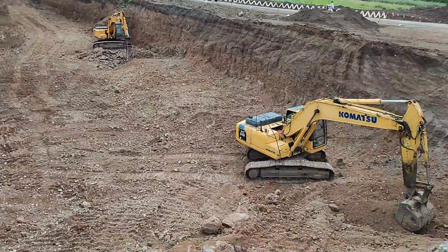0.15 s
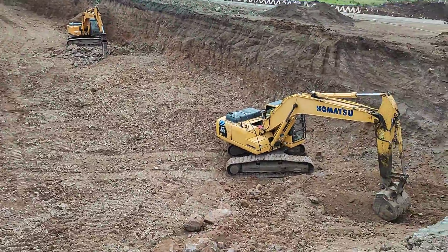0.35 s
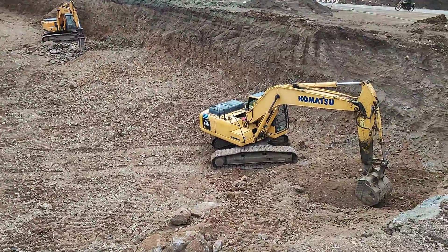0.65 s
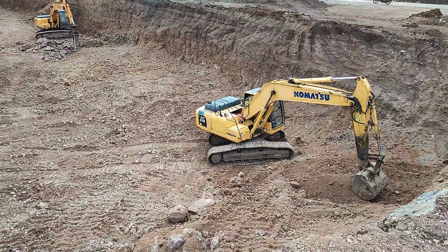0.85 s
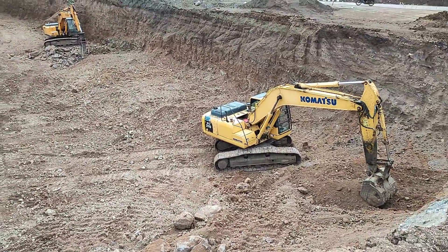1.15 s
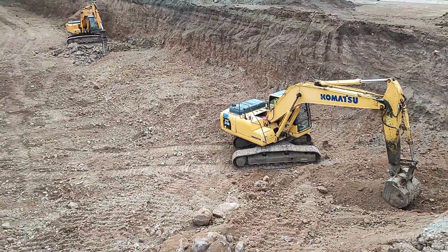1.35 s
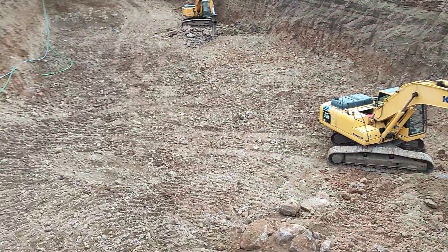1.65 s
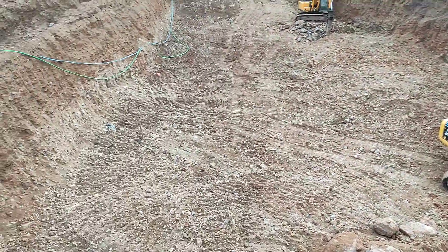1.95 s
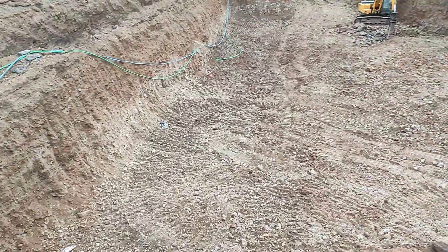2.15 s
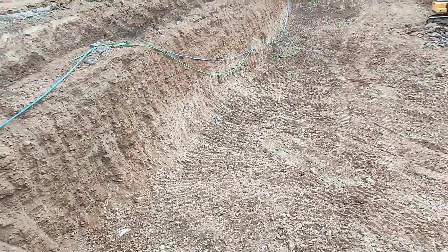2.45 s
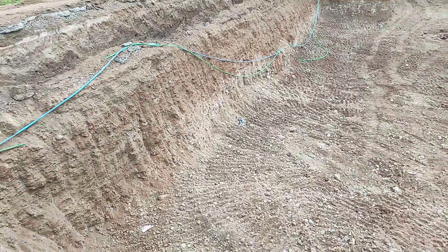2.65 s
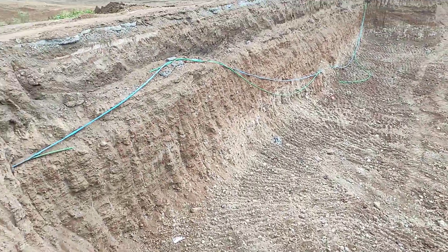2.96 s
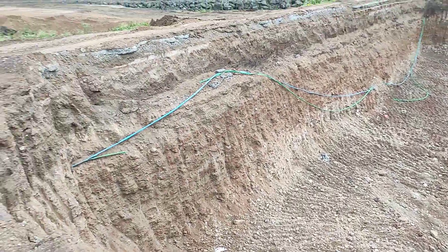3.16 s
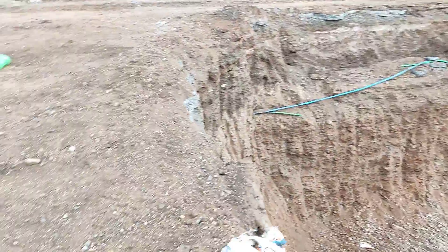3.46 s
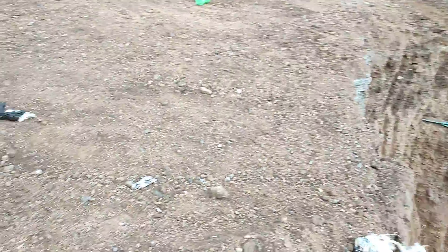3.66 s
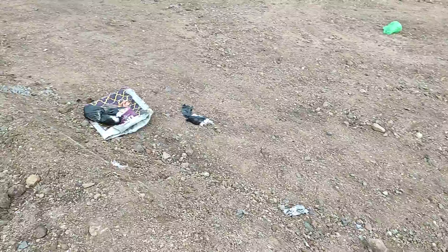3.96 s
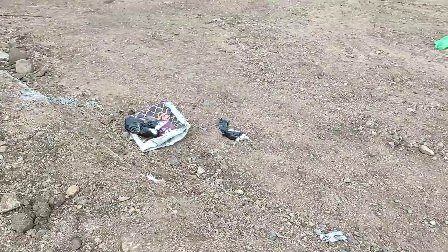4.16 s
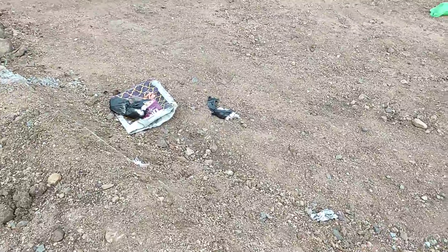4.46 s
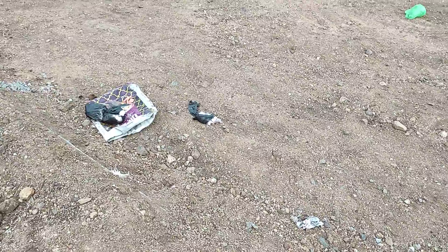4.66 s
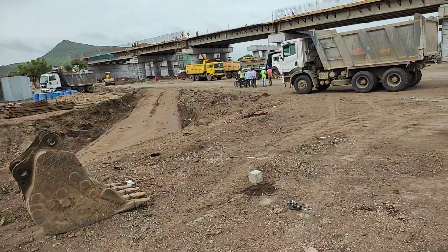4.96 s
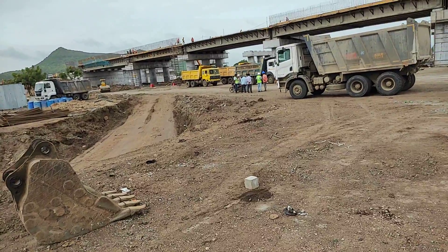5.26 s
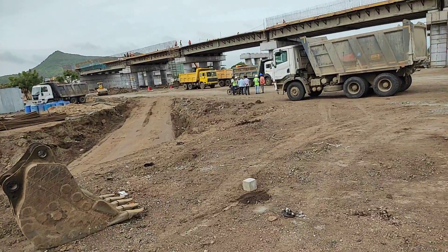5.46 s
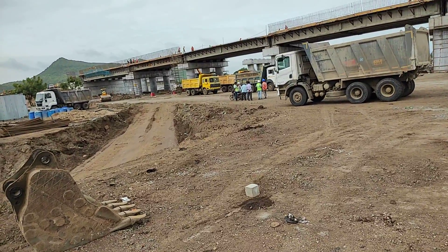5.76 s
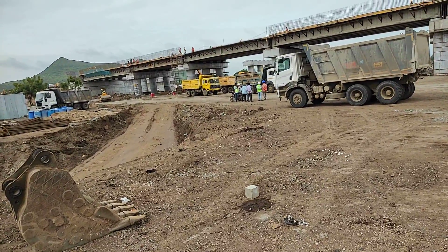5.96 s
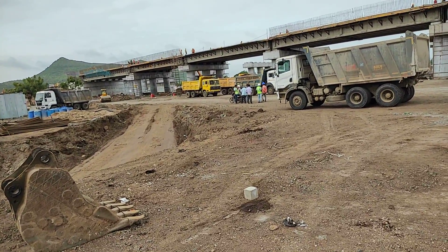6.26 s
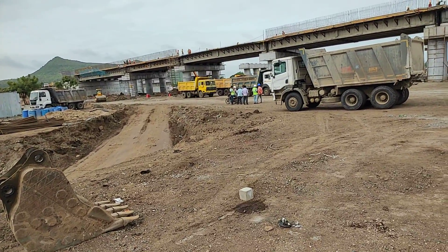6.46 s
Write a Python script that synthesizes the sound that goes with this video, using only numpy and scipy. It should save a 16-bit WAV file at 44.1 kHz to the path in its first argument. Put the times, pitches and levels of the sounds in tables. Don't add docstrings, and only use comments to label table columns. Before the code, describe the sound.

In an open pit heard from its rim, a hydraulic hammer pounds rock in fast, even blows, each with a hard crack, ringing steel, dull thump and hiss of oil, echoing off close walls. Diesel engines drone beneath. Wind slaps the handheld stereo microphone as it turns, loose rock slides and steel scrapes on stone. An abrupt cut moves to a yard, where the hammering restarts softer and grows again through strong gusts.

```python
import sys
import numpy as np
from scipy import signal
from scipy.fft import rfft, irfft, next_fast_len
from scipy.io import wavfile
from scipy.ndimage import uniform_filter1d

SR = 44100
rng = np.random.default_rng(int(sys.argv[2]) if len(sys.argv) > 2 else 0)


def unload_audio(sound):
    columns = np.transpose(np.atleast_2d(sound))
    steps = np.round(np.clip(columns, -1, 1) * 32767)
    wavfile.write(sys.argv[1], SR, steps.astype(np.int16))


def magnitude_from_level(level_db):
    exponent = np.asarray(level_db, float) / 20
    return 10 ** exponent


N = 291496
MOVE_S = 4.74

# (time [s], strength [dB])
RIM_BLOWS = [(0.1148, -20.5), (0.3086, -21), (0.504, -20.5), (0.6975, -19), (0.894, -19.5), (1.0894, -18.5),
             (1.283, -19.5), (1.4774, -21), (1.6727, -20), (1.8644, -18.5), (2.0586, -22), (2.255, -21.5),
             (2.4507, -21), (2.646, -21.5), (2.8427, -23), (3.0471, -23), (3.248, -22.5), (3.4473, -20.5),
             (3.645, -20.5), (3.8472, -26), (4.0502, -25.5), (4.2503, -25), (4.4491, -25.5),
             (4.6459, -26.5)]
# (time [s], strength [dB])
YARD_BLOWS = [
    (4.784, -28.5),
    (4.987, -28),
    (5.185, -25),
    (5.3808, -23),
    (5.5723, -22.5),
    (5.7685, -23.5),
    (5.9643, -24),
    (6.16, -25.5),
    (6.354, -24),
    (6.557, -21.5),
]
BLOWS = RIM_BLOWS + YARD_BLOWS
# (boom pitch [Hz], near wall delay [s], its level [dB], far wall delay [s], its level [dB])
PLACES = [
    (354.5, .03, -3, 0.038, -23),
    (340.3, 0.029, -2, 0.099, -34.5),
]
# (time [s], boom [dB], plates [dB], crack [dB], hiss [dB], scattered share [0-1])
AIM = [
    (0, 12.8, 6.5, -2, -9, 0.99),
    (1.5, 10.8, 7.5, 2, -12, 0.87),
    (2.4, 4.6, -1, -5.5, 5, 1),
    (3.5, 1.3, 10.5, -3, 0, 0.68),
    (4.73, 4.8, 1, 6.5, 12, 0.49),
    (4.75, 6.6, -20, 0.5, -2.5, 0.23),
    (6.61, 1.4, -6, -2, -4.5, 0.33),
]
# (frequency [Hz], level per Hz [dB])
HISS = [(1500, -9.5), (3000, 0), (4500, -3), (6000, 0), (9000, 1), (12000, -6.5), (16000, -1.5)]


def in_time(rows):
    s, *columns = np.transpose(rows)
    return [np.interp(np.arange(N) / SR, s, c) for c in columns]


def rms_one(x):
    return x / np.sqrt(np.mean(x ** 2))


def colour(x, points, column=1):
    size, points = next_fast_len(N), np.array(points)
    hz = np.maximum(np.arange(size // 2 + 1) * SR / size, 1)
    gain_db = np.interp(np.log(hz), np.log(points[:, 0]), points[:, column])
    return irfft(rfft(x, size) * magnitude_from_level(gain_db), size)[..., :N]


def noise(points, channels=3):
    return rms_one(colour(rng.standard_normal((channels, N)), points))


def drift(rate_hz, channels=1):
    r = np.exp(-2 * np.pi * rate_hz / SR)
    raw = rng.standard_normal((channels, N + SR))
    return rms_one(signal.lfilter([1], [1, -2 * r, r * r], raw)[:, SR:])


def resonate(x, hz, width_hz):
    r = np.exp(-np.pi * width_hz / SR)
    feedback = [1, -2 * r * np.cos(2 * np.pi * hz / SR), r * r]
    return signal.lfilter([(1 - r * r) / 2, 0, (r * r - 1) / 2], feedback, x)


def envelope(clicks, rise_s, fast_s, slow_s, slow_db):
    t = np.arange(-SR // 4, SR // 4 + 1) / SR
    fall = np.exp(-2 * np.abs(t) / fast_s) + magnitude_from_level(2 * slow_db) * np.exp(-2 * np.abs(t) / slow_s)
    shape = np.where(t < 0, np.exp(-2 * np.abs(t) / rise_s), fall / fall.max())
    return np.sqrt(np.maximum(signal.fftconvolve(clicks ** 2, shape, "same"), 0))


def arrive(sound, pan_db, scattered):
    # (time [s], lag [ms])
    port_lag = [(0, 1.18), (1.9, 1.15), (2.1, -.22), (3.0, -.33), (3.6, -.47), (4.73, -.46), (4.75, .41),
                (6.61, .40)]
    lag = np.round(in_time(port_lag)[0] * SR / 1000).astype(int)
    delays = np.array([np.maximum(lag, 0), np.maximum(-lag, 0)])
    late = sound[0][np.clip(np.arange(N) - delays, 0, N - 1)]
    share = np.clip(scattered, 0, 1)
    mixed = np.sqrt(1 - share) * late + np.sqrt(share) * sound[1:]
    return mixed * magnitude_from_level(np.array([[1], [-1]]) * pan_db / 2)


def diesels():
    # (time [s], firing rate [Hz], tones [dB], drone [dB], fan hiss [dB])
    running = [(0, 51.6, -40, -28.5, -43), (1, 52.1, -36.5, -27.5, -48.5), (2, 53.2, -38, -28, -44.5),
               (3.5, 53.63, -32, -29.5, -45.5), (4.7, 53.87, -37.5, -31, -44),
               (4.8, 51.54, -44.5, -27, -41.5), (6.61, 53.6, -29.5, -32.5, -42)]
    # (multiple of the firing rate [1], level [dB])
    orders = [(1, 0.5), (2, -4), (3, 3), (4, -6), (5, -2)]
    # (frequency [Hz], level per Hz [dB])
    drone_spectrum = [(15, -16), (25, 6.5), (45, 5.5), (223, -13), (713, -15), (987, -11.5), (1280, -19.5),
                      (1400, -17.5), (1770, -20.5), (2500, -25.5), (2750, -24.5), (3160, -28.5),
                      (6500, -33), (8450, -34), (14300, -120)]
    firing_hz, tones_db, drone_db, fan_db = in_time(running)
    phase = 2 * np.pi * np.cumsum(firing_hz * (1 + 0.013 * drift(8.1)[0])) / SR
    sway_db = drift(2.8, channels=len(orders))
    tones = sum(magnitude_from_level(db + sway) * np.sin(k * phase) for (k, db), sway in zip(orders, sway_db))
    tones = tones * magnitude_from_level(tones_db)
    drone = noise(drone_spectrum) * magnitude_from_level(drone_db + 1.35 * drift(1.35) + 0.43 * np.cos(phase))
    fan = noise(HISS) * magnitude_from_level(fan_db + 0.18 * drift(22))
    scattered = in_time(AIM)[4]
    return (arrive(np.array([tones] * 3), 0.56, 0)
            + arrive(drone, 0.48, 1.11 * scattered)
            + arrive(fan, -1.3, 9.2 * scattered))


def gusts(table, breeze_db):
    rise_s, fall_s = 0.0022, 0.028
    t = np.arange(0, N + 16, 16) / SR
    power = magnitude_from_level(2 * np.array(breeze_db))[:, None] * np.ones(len(t))
    for s, length, *level_db in table:
        shape = np.exp(np.minimum((t - s) / rise_s, 0) - np.maximum((t - s - length) / fall_s, 0))
        power = power + magnitude_from_level(2 * np.array(level_db))[:, None] * shape ** 2
    return np.array([np.interp(np.arange(N) / SR, t, np.sqrt(row)) for row in power])


def wind_slaps(table):
    swing_cycles, shortest_s = 0.73, 0.00097
    swing, clicks = np.zeros(N + SR), np.zeros(N)
    t = np.arange(-SR // 50, SR // 50) / SR
    for (s, db, hz), turn in zip(table, rng.random(len(table))):
        steeper_rise = np.where(t < 0, 2.5, 1)
        shape = np.exp(-(t / (shortest_s + swing_cycles / hz) * steeper_rise) ** 2)
        start = round((s + t[0]) * SR)
        swing[start:start + len(t)] += magnitude_from_level(db - 1.0) * shape * np.cos(2 * np.pi * (hz * t + turn))
        clicks[round(s * SR)] = magnitude_from_level(db) * (hz > 450)
    return swing[:N], clicks


def wind():
    # (rumble [dB], flutter [dB])
    breeze = [
        (-27.5, -36.5),
        (-33, -41),
    ]
    # (time [s], length [s], rumble [dB], flutter [dB])
    left_gusts = [(0, 0.036, -24, -35), (.45, 0.13, -22, -56), (1.87, 0.066, -23, -38),
                  (1.968, 0.053, -15, -16.5), (2.015, 0.041, -17, -23), (2.082, 0.042, -13, -19),
                  (2.166, 0.06, -10.5, -18), (2.236, 0.032, -25, -27), (2.3, 0.024, -18.5, -18),
                  (2.475, 0.034, -15, -22), (2.563, 0.086, -15.5, -29), (2.72, 0.082, -18.5, -26.5),
                  (2.892, 0.065, -19, -18), (2.96, 0.017, -18, -20), (3.24, 0.2, -21, -29.5),
                  (3.37, 0.035, -18, -20.5), (3.415, 0.087, -13, -27), (3.515, 0.062, -11, -28),
                  (3.6, 0.13, -13.5, -23), (3.76, 0.16, -18.5, -26), (4.05, 0.071, -20, -33),
                  (4.66, .08, -24.5, -45), (4.8, 0.11, -13.5, -28.5), (4.95, 0.066, -14.5, -24),
                  (5.08, 0.27, -14, -28.5), (5.37, 0.18, -16, -21.5), (5.58, 0.26, -18.5, -40),
                  (5.9, 0.21, -20.5, -53), (6.16, 0.054, -15, -30.5), (6.245, 0.044, -15.5, -16),
                  (6.31, 0.077, -14, -17), (6.41, 0.043, -18, -23), (6.458, 0.19, -23, -23)]
    right_gusts = [(.12, 0.068, -16, -44), (1.2, 0.078, -27, -48), (1.62, 0.17, -23.5, -48),
                   (1.825, 0.039, -22, -27), (1.865, 0.077, -16, -19.5), (1.98, 0.24, -18.5, -23),
                   (2.2, 0.095, -23, -30), (2.45, 0.23, -23, -42), (3.05, 0.44, -22.5, -43),
                   (3.44, 0.14, -13.5, -34), (3.96, 0.051, -19.5, -53), (4.15, 0.044, -16, -29),
                   (4.25, 0.063, -24, -30), (4.93, 0.066, -18, -33), (5.26, 0.045, -15, -22.5),
                   (5.33, 0.11, -23, -45), (5.55, 0.54, -26.5, -58), (6.42, 0.23, -18.5, -38)]
    # (time [s], length [s], level [dB])
    rasps = [(1.969, 0.022, -22.5), (2.09, 0.035, -21.5), (2.235, 0.032, -19.5), (2.572, 0.0099, -13.5),
             (2.893, 0.065, -17.5), (3.42, 0.072, -25), (5.44, 0.046, -50), (6.26, 0.18, -36),
             (6.46, 0.22, -24.5)]
    # (time [s], level [dB], pitch [Hz])
    left_slaps = [(1.97, -5.5, 850), (2.088, -16, 260.0), (2.099, 0, 262), (2.106, -6, 750),
                  (2.173, -2.5, 810.0), (2.199, -5, 280.0), (2.21, -6, 570.0), (2.239, -4.5, 724),
                  (2.269, -11, 680.0), (2.31, -18, 680.0), (2.502, -8, 610.0), (2.566, -11.0, 735),
                  (2.579, -9, 960), (2.605, -3.5, 734), (2.905, -11, 317), (2.913, -9, 905),
                  (2.959, -8, 745), (3.415, -7.5, 656), (3.439, -3, 654), (3.448, 2, 250.0),
                  (3.457, -13, 640.0), (3.47, -11, 219), (3.483, -17, 880.0), (3.49, -4, 228),
                  (3.509, -18, 620.0), (3.532, -6, 198), (3.553, -16, 550.0), (3.649, 0, 290.0),
                  (3.664, -3, 276), (3.677, -4, 564), (3.701, -21, 590.0), (3.722, -12, 556),
                  (4.819, -29, 288), (4.864, -3, 249), (4.891, -6.5, 556), (4.903, 1.5, 330),
                  (4.968, -10, 537), (4.994, -5, 270.0), (5.087, -14.5, 800), (5.118, -8, 236),
                  (5.155, -7, 201), (5.185, -8, 272), (5.211, -8.5, 730.0), (5.232, -1, 176),
                  (5.354, -8.5, 604), (5.407, 0.5, 310.0), (5.445, -4.5, 590), (5.457, 0, 360.0),
                  (5.464, -4, 564), (5.488, -10, 655), (5.51, -21, 556), (5.524, -5, 188.4),
                  (5.568, -9, 300.0), (5.766, -2, 272), (6.26, -2, 330), (6.275, -4.5, 559),
                  (6.311, 0, 300.0), (6.33, -3, 266), (6.351, -6.5, 540.0), (6.386, -4.5, 618),
                  (6.407, -23, 632), (6.443, -8, 601), (6.462, -4, 770), (6.477, -17, 710.0),
                  (6.5, -7, 650.0), (6.521, -6, 560.0), (6.538, -4, 603), (6.583, -2.5, 554)]
    right_slaps = [(1.64, -6, 185), (1.71, -5, 179), (1.825, -6, 270.0), (1.868, -8.5, 680.0),
                   (1.884, 2, 230.0), (1.9, -13, 596), (1.924, -2.5, 580.0), (1.991, -10, 730.0),
                   (2.008, -8, 272), (2.052, -12, 696), (2.104, -22, 750.0), (2.129, -8, 710),
                   (2.147, -25, 600.0), (3.464, -12, 620.0), (3.477, -11, 710.0), (3.491, -16, 210.0),
                   (3.511, -11, 620), (3.53, -8, 220.0), (3.58, -13, 230.0), (4.184, -9.5, 700),
                   (4.954, -1, 239), (5.299, -5.5, 206)]
    # (frequency [Hz], level per Hz [dB])
    rumble_spectrum = [(20, -7), (50, 5), (100, 2.5), (190, 7.5), (300, -0.5), (450, -7), (800, -53)]
    flutter_spectrum = [(200, 3.5), (400, 7.5), (700, -6), (1200, -15.5), (2000, -33), (3500, -60)]
    rasp_spectrum = [(400, -32), (800, 5), (1200, -1.5), (1800, -12.5), (3000, -41)]
    slap_spectrum = [(100, 9.5), (250, 14), (600, 8), (1200, -18.5), (2200, -25), (4000, -66)]
    left, right = gusts(left_gusts, breeze[0]), gusts(right_gusts, breeze[1])
    low, high = np.array([left[0], right[0]]), np.array([left[1], right[1]])
    eddies, flaps = np.tanh(drift(36.0, channels=2)), np.tanh(drift(66, channels=2))
    rumble = noise(rumble_spectrum, channels=2) * low * magnitude_from_level(-1.5 + 1.4 * eddies + 1.24 * flaps)
    flutter = noise(flutter_spectrum, channels=2) * high * magnitude_from_level(1.5 + 6.6 * eddies + 2.5 * flaps)
    rasp = noise(rasp_spectrum, channels=1) * gusts(rasps, [-70]) * magnitude_from_level(-3.5 + 9.0 * flaps[0])
    rasp = rasp * magnitude_from_level(np.array([[0], [-25]]))
    left_swing, left_clicks = wind_slaps(left_slaps)
    right_swing, right_clicks = wind_slaps(right_slaps)
    swings = np.array([left_swing, right_swing])
    bursts = np.array([envelope(c, 0.0021, 0.0019, 0.029, -7.5) for c in (left_clicks, right_clicks)])
    rattle = magnitude_from_level(-0.5) * noise(slap_spectrum, channels=2) * bursts
    return rasp + rumble + flutter + swings + rattle


def gravel():
    # (time [s], level [dB], length [s], rise [s])
    slides = [
        (2.212, 3.5, 0.16, 0.067),
        (2.84, -1, 0.028, 0.006),
    ]
    # (time [s], peak level [dB])
    grit_ticks = [
        (6.227, -21),
        (6.235, -31),
        (6.265, -28),
    ]
    # (frequency [Hz], level per Hz [dB])
    slide_spectrum = [(400, -16), (1500, -5), (3200, -7), (5000, 2.5), (9000, -6), (15000, 1)]
    t = np.arange(N) / SR
    rush = np.zeros(N)
    for s, db, length, rise in slides:
        rush += magnitude_from_level(db) * np.clip((t - s) / rise, 0, 1) * np.exp(-np.abs((t - s) / length) ** 3)
    ticks = np.full(N, 1e-18)
    for s, db in grit_ticks:
        ticks[round(s * SR)] = magnitude_from_level(db + 15)
    slide = magnitude_from_level(-24) * noise(slide_spectrum) * magnitude_from_level(1.4 * drift(90)) * rush
    grit = resonate(ticks, 8000, 7000) + 3 * resonate(ticks, 14000, 5000)
    grit = grit + magnitude_from_level(-20) * noise(HISS) * envelope(ticks, .0003, .0015, .004, -8)
    return arrive(slide, in_time(AIM)[3], 1.0) + arrive(grit, 6.0, 0.18)


def scrape():
    start_s, level_db, bite_s, length_s = 3.773, -33.5, 0.054, 0.46
    # (frequency [Hz], width [Hz], level [dB])
    squeal_bands = [(3230, 300, -7.5), (2800, 150, -13), (4800, 1700, -6.5)]
    t = np.maximum(np.arange(N) / SR - start_s, 0)
    stroke = (t > 0) * (np.exp(-t / bite_s) + magnitude_from_level(-5.0) * np.exp(-(t / length_s) ** 3))
    grains = rng.standard_normal((3, N)) * magnitude_from_level(1.3 * drift(60))
    squeal = sum(magnitude_from_level(db) * rms_one(resonate(grains, hz, w)) for hz, w, db in squeal_bands)
    return arrive(magnitude_from_level(level_db) * stroke * squeal, 0.1, 1.0)


def strikes(level_db, walls=1):
    out = np.full(N + SR, 1e-18)
    for (s, _), db in zip(BLOWS, level_db):
        _, near_s, near_db, far_s, far_db = PLACES[int(s > MOVE_S)]
        out[round(s * SR)] += magnitude_from_level(db)
        out[round((s + near_s) * SR)] += walls * magnitude_from_level(db + near_db)
        out[round((s + far_s) * SR)] += walls * magnitude_from_level(db + far_db)
    return out[:N]


def hiss_returns(hiss_db):
    # (delay [s], level against the hiss [dB])
    pier = [(0.04, 0.5), (0.033, 6), (0.031, 7), (0.031, 4), (0.032, -2), (.033, -8), (0.037, 0),
            (0.025, 2), (0.038, 0.5), (0.032, 2)]
    ledge = (0.095, -14.5)
    out = np.full(N + SR, 1e-18)
    paths = [ledge] * len(RIM_BLOWS) + pier
    for (s, _), db, (delay_s, loss_db) in zip(BLOWS, hiss_db, paths):
        out[round((s + delay_s) * SR)] = magnitude_from_level(db + loss_db)
    return out[:N]


def pit_echoes(clicks, per_s, decay_s, direct):
    t = np.arange(SR // 6) / SR
    hits = rng.random((3, len(t))) < per_s / SR
    echoes = hits * rng.standard_normal((3, len(t))) * np.exp(-t / decay_s)
    echoes[:, 0] = direct
    return signal.fftconvolve(clicks[None], echoes)[:, :N]


def swelling_ring(level_db, hz, swell_s):
    out, t = np.zeros(N + SR), np.arange(SR // 5) / SR
    start_phase = rng.normal(0, 0.24, len(hz))
    shape = (t / swell_s) ** 0.45 * np.exp(.3 - 0.24 * (t / swell_s) ** 2.45)
    for (s, _), db, f, phase in zip(BLOWS, level_db, hz, start_phase):
        start = round(s * SR)
        out[start:start + len(t)] += magnitude_from_level(db) * shape * np.sin(2 * np.pi * f * t + phase)
    return out[:N]


def oil_hiss(hiss_db):
    direct = envelope(strikes(hiss_db - 7), 0.017, 0.035, 0.036, -14.5)
    back = envelope(hiss_returns(hiss_db - 6), .005, .009, .03, -17)
    return noise(HISS) * magnitude_from_level(2.36 * drift(42)) * np.hypot(direct, back)


def ground_thud(crack_db):
    # (frequency [Hz], level per Hz [dB])
    thud_spectrum = [(60, -12), (150, 0.5), (260, 6), (450, -2), (700, -26)]
    return noise(thud_spectrum) * envelope(strikes(crack_db - 1.5), 0.0024, 0.039, 0.082, -13)


def boom_and_arm(boom_db, arm_db):
    boom_hz = [PLACES[int(s > MOVE_S)][0] for s, _ in BLOWS]
    boom = swelling_ring(boom_db + 0.5, boom_hz, 0.022)
    return boom + swelling_ring(arm_db, np.full(len(BLOWS), 420.2), 0.026)


def plates(clang_db, rubble):
    # (frequency [Hz], width [Hz], level [dB])
    plate_modes = [(687, 35, -1), (810, 17, 1), (950, 97, -3), (1095, 32, 5), (1228, 140, -9),
                   (1300, 29, -5.5), (1330, 12, -22)]
    drive = pit_echoes(strikes(clang_db + 16), 480, 0.04, 1.2)
    drive = drive + rubble * envelope(strikes(clang_db + 6.5), 0.00031, 0.032, 0.037, -7)
    return sum(magnitude_from_level(db) * resonate(drive, hz, w) for hz, w, db in plate_modes)


def rock_crack(crack_db, rubble):
    # (frequency [Hz], level per Hz [dB])
    crack_spectrum = [(500, -17), (800, 7.5), (1500, -5), (2500, -7.5), (4000, -16), (6000, -38),
                      (9000, -34)]
    shower = envelope(strikes(crack_db - 5.5), 0.00054, 0.041, 0.035, -2.7)
    return rms_one(colour(rubble, crack_spectrum)) * shower


def chisel(s, crack_db):
    # (frequency [Hz], width [Hz], level [dB])
    shank_modes = [(1516, 195, 8), (1695, 58, 2.5), (1924, 41, 8.5), (2200, 74, 6), (2490, 120, 5),
                   (2655, 55, 4.5), (2870, 150, -7), (3180, 110, 2.5), (3400, 400, -4), (4260, 140, -0.5),
                   (5170, 130, -19), (6260, 440, 0)]
    # (frequency [Hz], width [Hz], level at the rim [dB], level in the yard [dB])
    tip_modes = [(1510, 70, -26, -14), (1715, 27, -0.5, -30), (1880, 77, 2, -31), (2336, 60, -30, 4)]
    # (time [s], shank [dB], tip [dB])
    facing = [(0, -0.5, -10), (.9, 0, -4), (1.8, 0.5, 5), (2.4, -1, -17), (2.9, 3.5, -10), (3.3, -1, 8.5),
              (3.8, 0.5, 5.5), (4.3, -1.5, 3), (4.65, 0, -10), (4.78, 0, -8), (5.3, 1, -2), (5.8, -8, 8),
              (6.2, 4, -10), (6.61, -6, -9)]
    shank_db, tip_db = (crack_db + c[(s * SR).astype(int)] for c in in_time(facing))
    knock = pit_echoes(strikes(shank_db + 17.5), 970, 0.032, 0.33)
    blow = np.searchsorted(s, np.arange(N) / SR + .003)
    seating_db = 4 * np.tanh(rng.standard_normal((len(s) + 1, len(shank_modes))))
    ring = np.zeros((3, N))
    for (hz, w, db), seat_db in zip(shank_modes, seating_db.T):
        ring += magnitude_from_level(db - 4.5 + seat_db[blow]) * resonate(knock, hz, max(w, hz / 35))
    for hz, w, rim_db, yard_db in tip_modes:
        place_db = np.where(s > MOVE_S, yard_db, rim_db)
        ring += resonate(strikes(tip_db + 30.0 + place_db, walls=0), hz, w)
    return ring


def breaker():
    # (time [s], boom [dB], bucket arm [dB], plates [dB], oil hiss [dB])
    shade = [(0, 5, -8, 10, -3), (.7, 5.5, -19, 1.5, -1.5), (1.1, 5.5, -9, -3.5, -4.5),
             (1.7, 8, -7, 4.5, -5), (2.0, -2, -19, -1.5, -8), (2.6, 1, -5.5, 6, 1.5),
             (3.25, -0.5, 1, 5.5, 1), (3.45, -6, -6, -15, -7.5), (3.9, -20, -3.5, 0.5, -6),
             (4.73, -11, -1.5, 0, -13), (4.75, 12.5, -7, -3, 6), (5.6, 5, -11, -9.5, 4),
             (6.61, 3.5, -15, 2, 2)]
    s, crack_db = np.transpose(BLOWS)
    boom_db, arm_db, clang_db, hiss_db = (crack_db + c[(s * SR).astype(int)] for c in in_time(shade))
    boom_pan, clang_pan, crack_pan, hiss_pan, scattered = in_time(AIM)
    rubble = rng.standard_normal((3, N)) * magnitude_from_level(6.1 * np.tanh(drift(190, channels=3)))
    crack = rock_crack(crack_db, rubble) + chisel(s, crack_db)
    boom = boom_and_arm(boom_db, arm_db)
    return (arrive(crack, crack_pan, scattered)
            + arrive(plates(clang_db, rubble), clang_pan, 0.32 * scattered)
            + arrive(oil_hiss(hiss_db), hiss_pan, scattered)
            + arrive(np.array([boom] * 3), boom_pan, 0)
            + arrive(ground_thud(crack_db), boom_pan, 0.71))


def scene():
    return diesels() + wind() + gravel() + scrape() + breaker()


def band_dips(x):
    # (frequency [Hz], width [Hz], readiness at the rim [1], readiness in the yard [1])
    wandering_dips = [(3050, 220, -.6, -1.5), (3650, 340, -1.1, -.1), (4000, 260, -.7, -.8),
                      (4750, 260, -.2, -1.5), (5350, 320, -.5, -1.3)]
    # (frequency [Hz], width [Hz], time after the blow [s], length [s])
    blow_dips = [
        (3640, 580, .002, .024),
        (3930, 500, .038, .021),
    ]
    t = np.arange(N) / SR
    for (hz, width_hz, rim, yard), chance in zip(wandering_dips, drift(7, channels=len(wandering_dips))):
        depth = np.clip(1.5 * (chance + np.where(t > MOVE_S, yard, rim)), 0, .97)
        x = x - depth * resonate(x, hz, width_hz)
    for hz, width_hz, after_s, length in blow_dips:
        depth = sum(np.exp(-((t - s - after_s) / length) ** 4) for s, _ in YARD_BLOWS)
        x = x - np.minimum(depth, .97) * resonate(x, hz, width_hz)
    return x


def gain_control(x):
    knee_db, slope, release_db_per_s, attack_s = -13.5, 0.34, 43, 0.055
    t = np.arange(N) / SR
    level_db = 10 * np.log10(uniform_filter1d(np.max(x ** 2, axis=0), size=1024) + 1e-12)
    cut_db = slope * np.maximum(level_db - knee_db, 0)
    held_db = np.maximum.accumulate(cut_db + release_db_per_s * t) - release_db_per_s * t
    r = np.exp(-1 / (attack_s * SR))
    return x * magnitude_from_level(-signal.lfilter([1 - r], [1, -r], held_db))


def roll_off(x):
    return signal.sosfilt(signal.butter(12, 14900, fs=SR, output="sos"), x)


def record(dry):
    # (frequency [Hz], left port [dB], right port [dB])
    port_response = [(97, 0.5, 1), (3230, 1, -0.5), (5400, -2.5, 0.5), (6820, -4.5, 1), (7720, 0, 10),
                     (8420, 7.5, 3.5), (9010, 5.5, -4.5), (9700, -9, -8), (10500, -24.5, -7),
                     (14100, -27, -18), (16100, -38, -52)]
    ports = np.array([colour(dry[k], port_response, column=k + 1) for k in range(len(dry))])
    ports = gain_control(band_dips(ports))
    limited = .9 * np.tanh(ports / .9)
    return roll_off(limited)


dry = scene()
out = record(dry)
unload_audio(out)
```